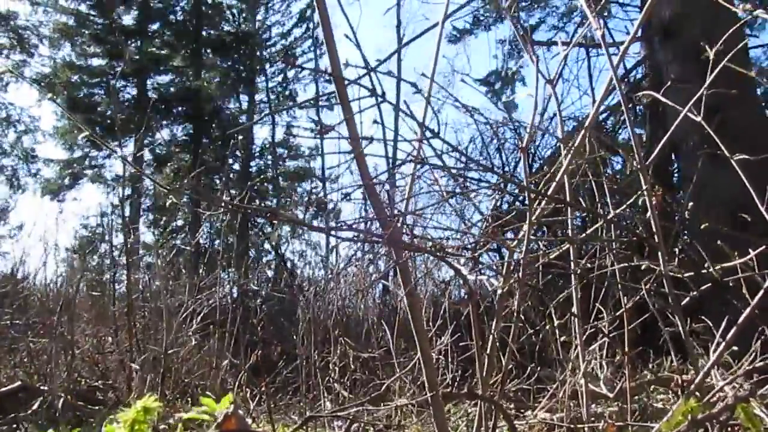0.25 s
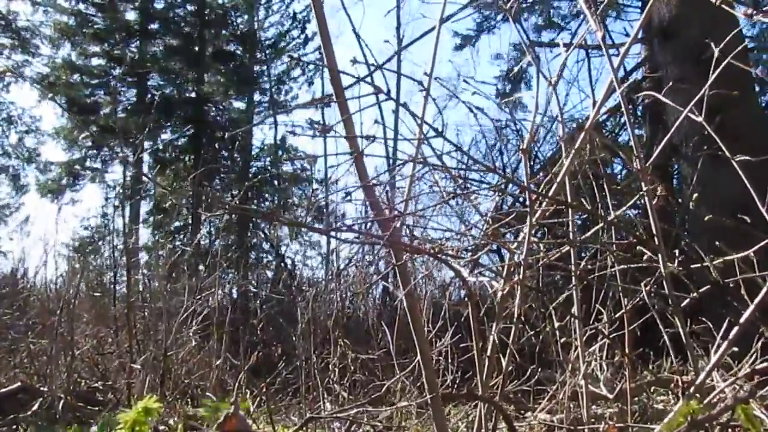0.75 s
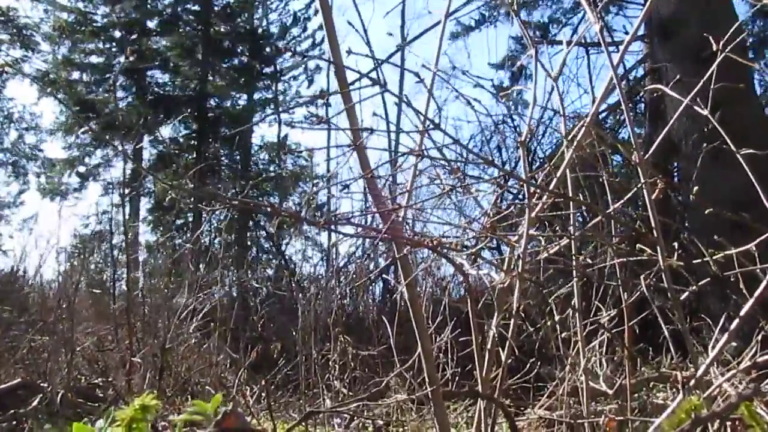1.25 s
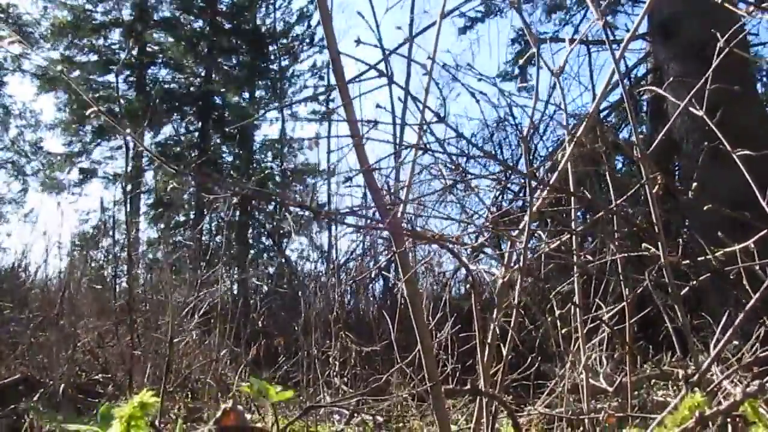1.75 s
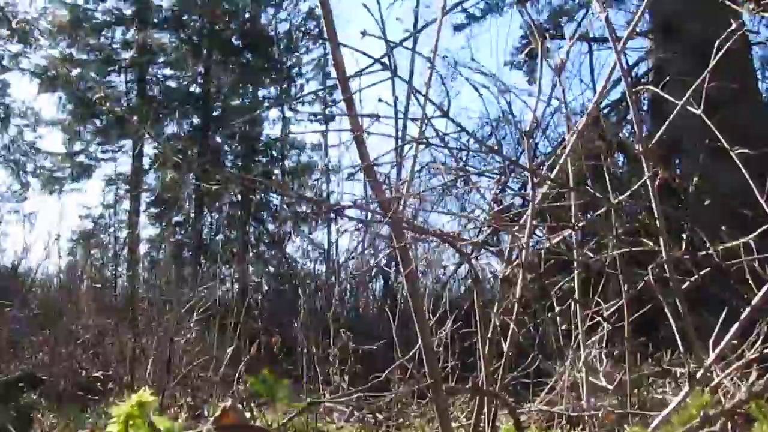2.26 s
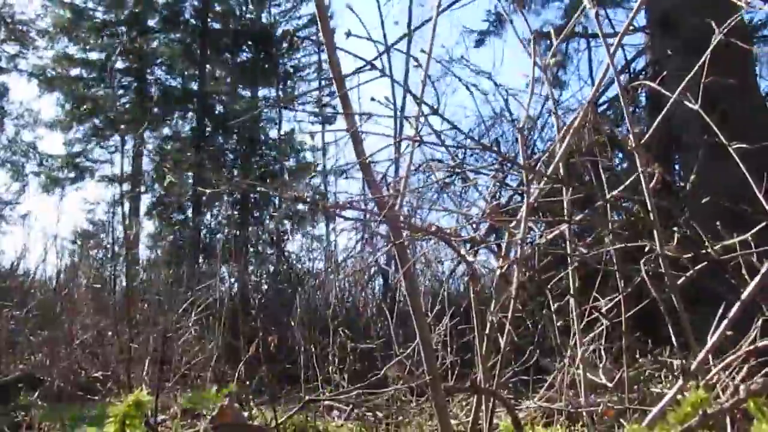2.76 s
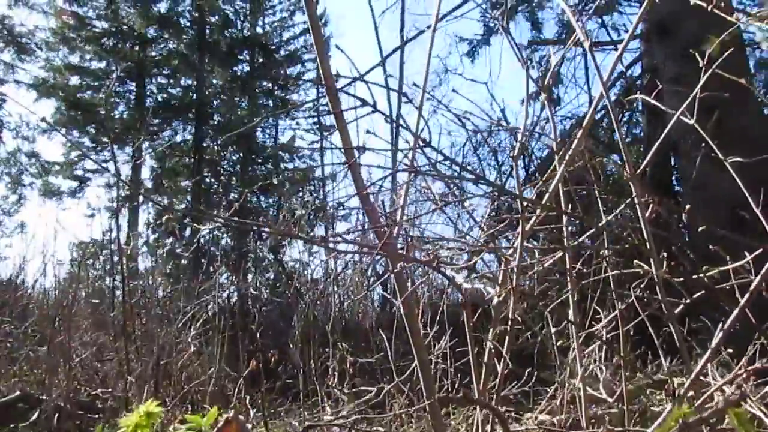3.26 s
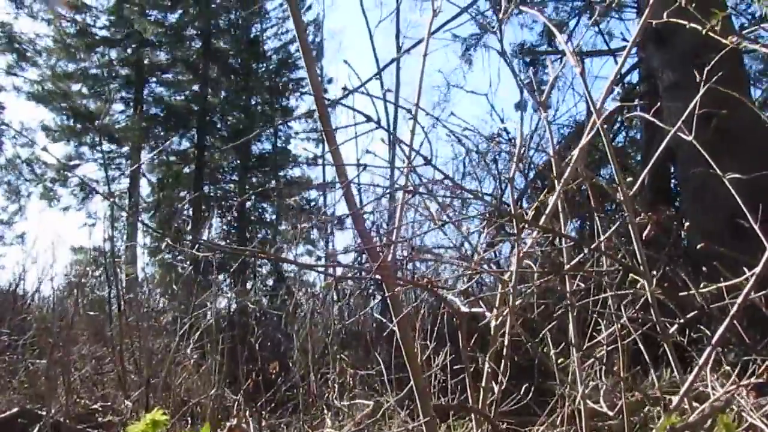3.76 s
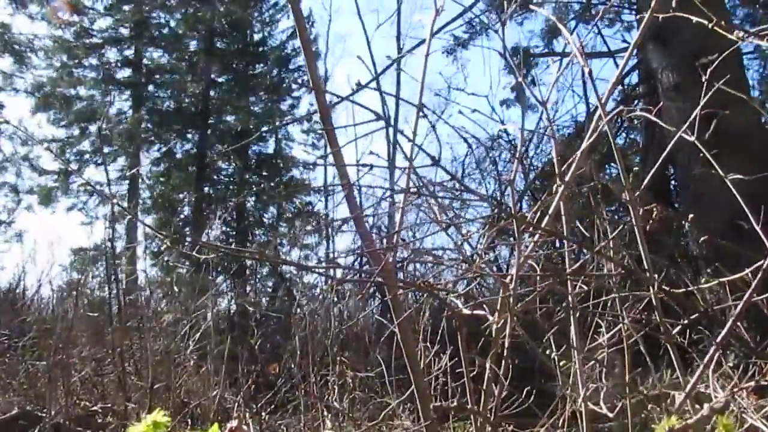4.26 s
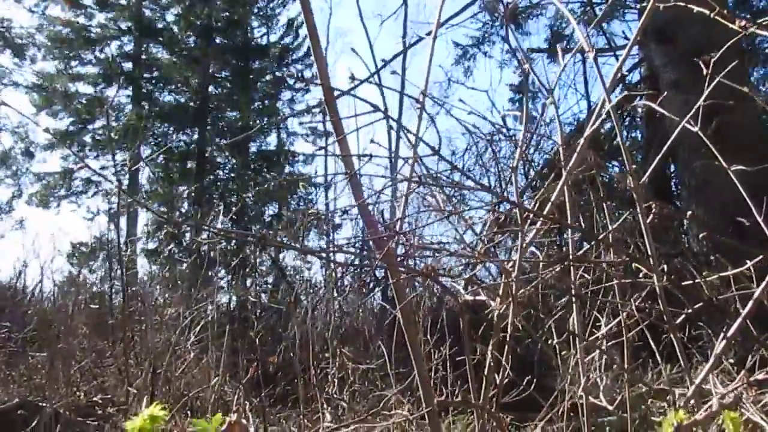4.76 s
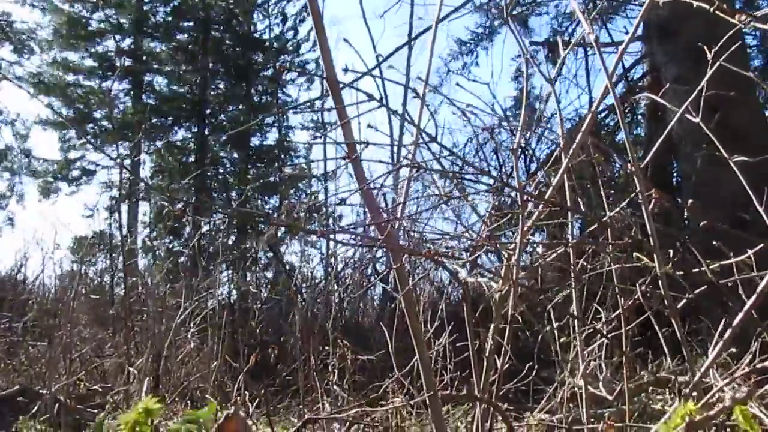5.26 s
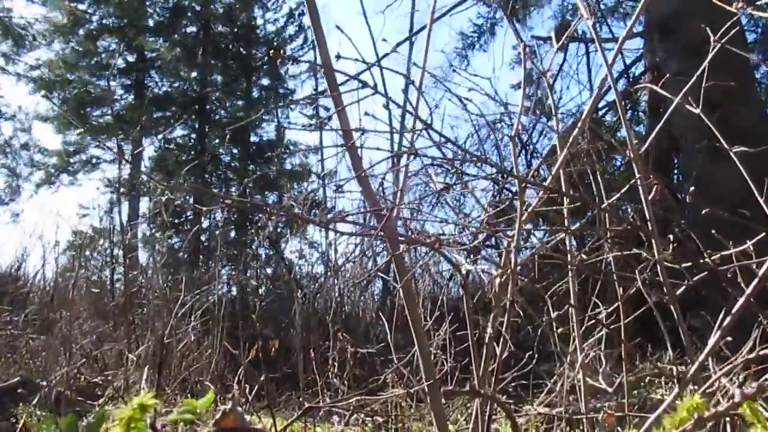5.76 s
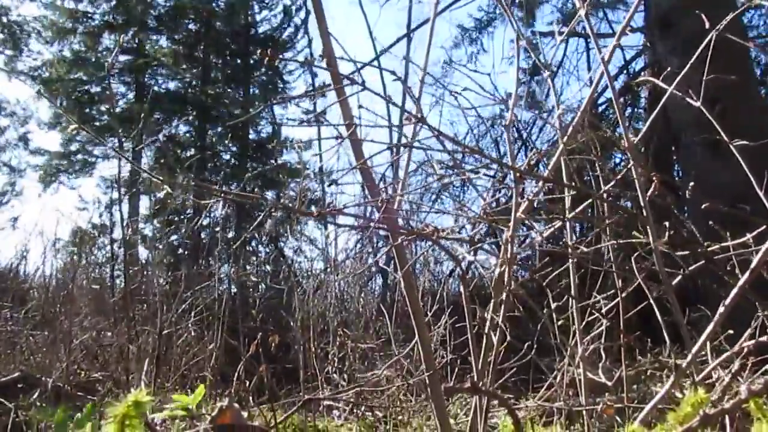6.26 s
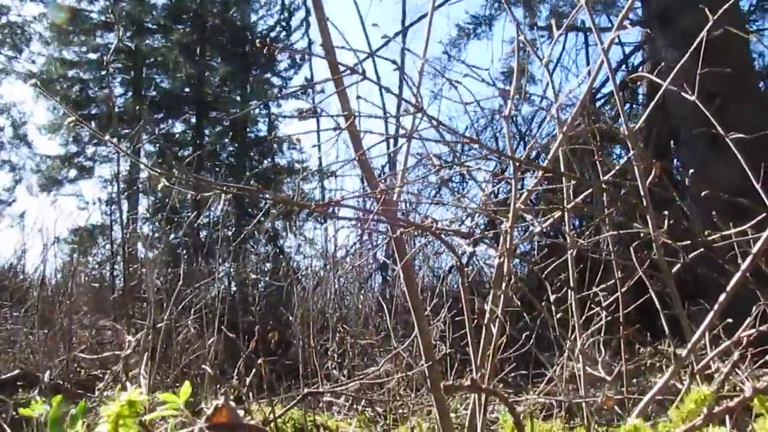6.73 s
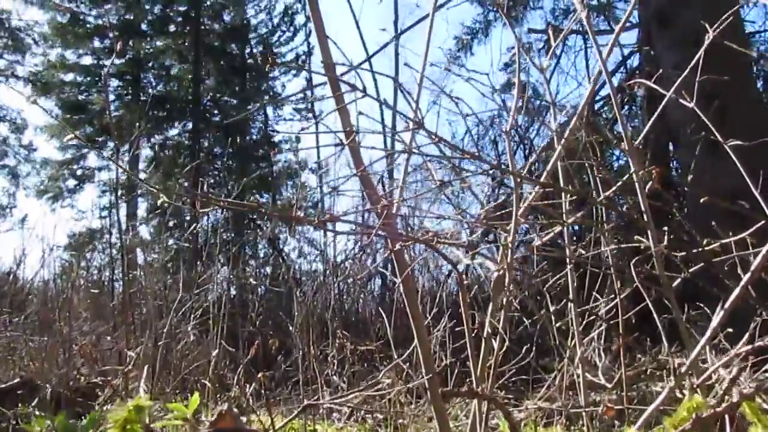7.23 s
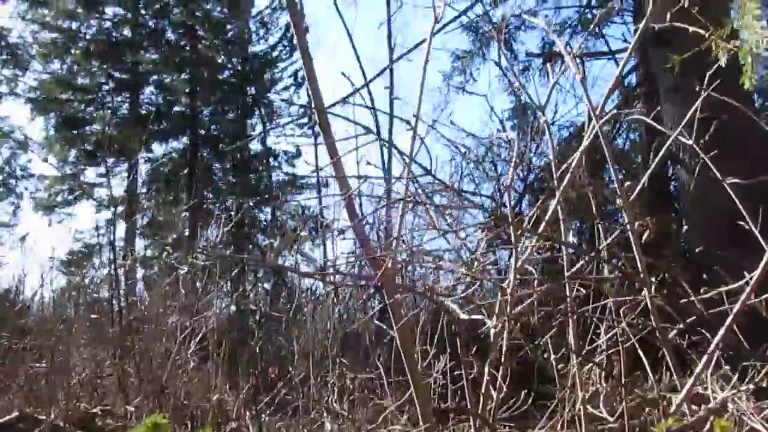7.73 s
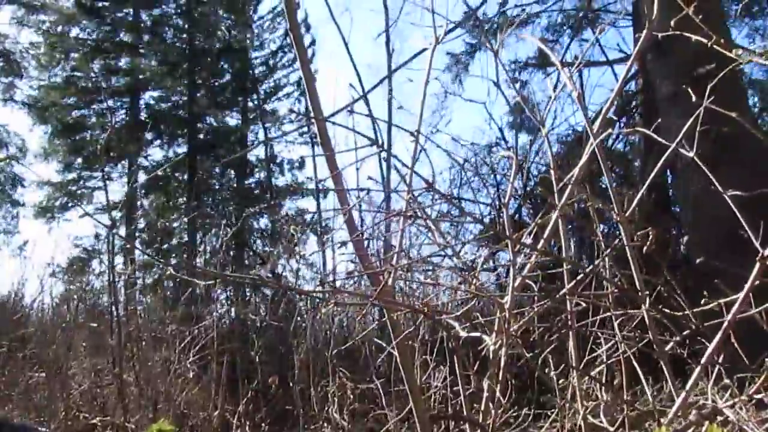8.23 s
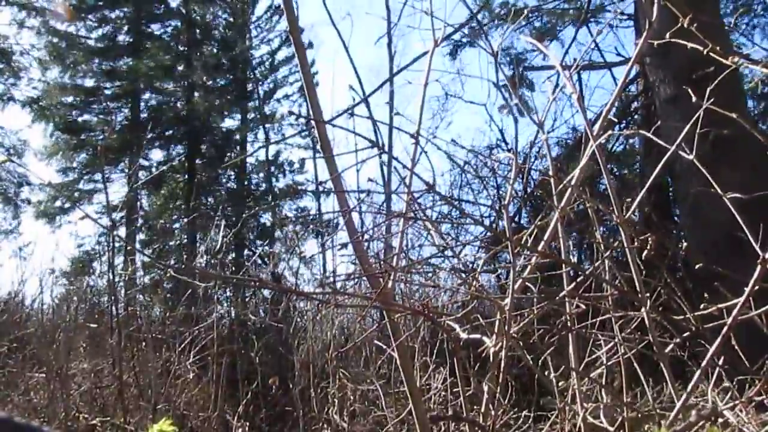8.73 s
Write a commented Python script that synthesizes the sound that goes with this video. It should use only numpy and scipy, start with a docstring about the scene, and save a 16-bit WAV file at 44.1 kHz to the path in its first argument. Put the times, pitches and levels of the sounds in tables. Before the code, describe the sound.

Strong wind hisses through conifer crowns while gusts rumble and slap hard against the microphone, easing in the middle, then the treetops swell louder.

```python
"""Strong wind rushes through conifer crowns and gusts buffet a small two-port microphone near the ground.
The wide hiss of the needles opens strong; hard slaps at the ports crowd in from 0.7 to 2.7 s and the hiss
sags. Lumpy rumble, higher in pitch where the air is faster, runs on; slaps thicken again from 3.6 to 4.7 s,
then get rare. A few dry twigs tick from 1.5 s on, and the crowns swell towards the end.
Needles are shaped noise, buffets a noise pattern read at the air speed, slaps and twigs short swings."""
import sys
import numpy as np
from scipy import signal
from scipy.fft import rfft, irfft
from scipy.io import wavfile
from scipy.ndimage import uniform_filter1d

SR = 44100
rng = np.random.default_rng(int(sys.argv[2]) if len(sys.argv) > 2 else 0)


def to_wav(s):
    """Save 16-bit WAV."""
    ch = np.atleast_2d(s).T  # columns
    pcm = np.round(np.clip(ch, -1, 1) * 32767)  # PCM
    wavfile.write(sys.argv[1], SR, pcm.astype(np.int16))


N = 396459  # samples, 8.99 s

# small fast eddies that slap a port: middle t/s, nominal level/dB, port (0 left, 1 right), nominal f/Hz
SLAP_EDDIES = [(0.366, -8, 0, 449), (0.726, -3.5, 1, 514.7), (0.737, 3, 1, 440), (0.748, -5, 0, 492),
               (0.761, -11, 1, 547), (0.777, -6.5, 1, 458), (0.813, -15, 0, 411), (0.905, -8, 0, 400),
               (1.05, -12, 0, 449.7), (1.148, -17, 1, 420.5), (1.643, -5, 0, 429), (1.673, -11, 1, 406),
               (1.704, -7, 0, 518.6), (1.729, -13, 0, 454), (1.767, -2.5, 0, 521.8), (1.816, -8, 0, 376.5),
               (1.896, 4.5, 0, 630), (1.917, 1.5, 1, 607), (1.928, 3, 1, 409), (2.003, -10, 0, 519),
               (2.073, -10, 0, 400.3), (2.098, -12, 0, 490), (2.12, -11.5, 0, 451), (2.133, -11.5, 0, 505),
               (2.161, -18, 0, 526), (2.226, -8.5, 0, 567.5), (2.232, -12, 1, 461), (2.24, -8, 0, 637),
               (2.289, -13.5, 1, 549.9), (2.303, -13, 0, 515), (2.317, -11, 1, 460), (2.319, -11, 0, 668),
               (2.34, -10.5, 1, 427), (2.48, -13, 0, 467.5), (2.494, -6, 0, 440), (2.495, -13, 1, 410),
               (2.519, -12, 1, 424), (2.551, -6, 1, 486.4), (2.555, -6, 0, 414.5), (2.642, -19, 0, 438.4),
               (2.655, -8.5, 0, 411.8), (3.655, -14, 1, 528), (3.705, -12, 1, 378.4),
               (3.754, -7.5, 1, 400.3), (3.821, -10.5, 1, 392.2), (3.854, -10, 1, 421),
               (4.041, -14, 0, 420), (4.065, -5, 0, 418.4), (4.092, -9.5, 1, 470), (4.113, -15, 0, 460.3),
               (4.126, -9, 0, 379.7), (4.156, -13, 0, 480.7), (4.166, -6.5, 0, 549.4),
               (4.281, -15, 0, 408.6), (4.296, -8.5, 1, 410), (4.41, -10, 0, 438.4), (4.492, -6, 1, 409.7),
               (4.546, -14, 1, 402.2), (4.578, -16, 1, 565.8), (4.636, -10.5, 1, 511),
               (5.37, -12.5, 1, 490.4), (6.441, -3.5, 1, 474.8), (7.68, -12.5, 1, 396.7)]


def gain_of(db):
    """Amplitude factor of a level in dB."""
    return 10 ** (np.asarray(db) / 20)


def evened(x):
    """Scale to rms 1."""
    return x / np.sqrt(np.mean(x ** 2) + 1e-20)


def read(points, hz):
    """Read a curve of (f/Hz, value) points along a logarithmic pitch axis."""
    f, value = np.transpose(points)
    return np.interp(np.log(hz + 1), np.log(f + 1), value)


def wander(seconds):
    """Smooth chance of rms 1 that changes over the given time."""
    span = max(int(seconds * SR), 1)
    once = uniform_filter1d(rng.standard_normal(N), span)
    return evened(uniform_filter1d(once, span))


def add(mix, s, sound, pan_db):
    """Place a sound between the channels; the mean of the two channel gains stays 1."""
    start = round(s * SR)
    part = mix[:, start:start + len(sound)]
    louder = gain_of(np.minimum([[pan_db], [-pan_db]], 0))
    part += louder * sound[:part.shape[1]] * 2 / louder.sum()


def drops():
    """Level change of the rush in dB: a quick fall at each drop and a slow creep back."""
    # falls of the rush, most of them close to hard slaps: t/s, nominal depth/dB
    falls = [(.36, 1.5), (.725, 9), (1.645, 2.5), (1.71, 1.5), (1.92, 10), (2.49, 1), (3.72, 2), (4.08, 2),
             (4.41, 2), (4.49, 1.5), (6.44, 1)]
    fall_s, return_s = 0.0069, 0.52  # time constants
    t = np.arange(N) / SR
    start, depth_db = np.array(falls)[:, :1], np.array(falls)[:, 1:]
    after = np.maximum(t - start, 0)
    dips = depth_db * (1 - np.exp(-after / fall_s)) * np.exp(-after / return_s)
    return -dips.sum(0)


def crowns():
    """Countless needles shed tiny vortices: noise with drifting patches and a faint shared flicker."""
    # swell of the crowns: t/s, level/dB, extra treble/dB (full over 9 kHz), extra body/dB (full under 1.8 kHz)
    swell = [(0, -25.5, .5, -2), (.3, -26, 0, 0), (.7, -26.5, 1, -0.5), (1.1, -27, .5, .5),
             (1.6, -26.5, 1, 0), (2.1, -33, 0.5, 1), (2.6, -30.5, 0.5, -0.5), (3.0, -29, -1, 0),
             (3.6, -27.5, -0.5, 0), (4.3, -29.5, 0, -0.5), (5.0, -31, 0.5, 0.5), (5.6, -30, -1, 1),
             (6.3, -29.5, 0, 1.5), (6.8, -31.5, .5, 3), (7.5, -28, 0, 1), (8.1, -26, 1, 0.5),
             (8.6, -21.5, -0.5, -0.5), (8.99, -21.5, 0, -.5)]
    # tone of the needles: f/Hz, relative level per Hz/dB
    needle_tone = [(150, -17), (250, 0.5), (400, -6), (600, -8.5), (800, -10.5), (1120, -5.5), (1500, -3),
                   (1900, -2.5), (2300, -5), (3000, -8), (4200, -13.5), (6000, -19.5), (8500, -27),
                   (12000, -38.5), (15600, -48)]
    # left-right likeness: f/Hz, likeness (0 apart, 1 the same)
    likeness = [(140, .5), (300, .88), (500, .9), (800, .75), (1300, .8), (1900, .68), (2800, .36),
                (4200, .22), (6400, .12), (10000, 0)]
    # tilt between the channels: f/Hz, left minus right level/dB
    tilt = [(60, 3), (180, -1.5), (550, 0), (1650, -1.5), (4970, -3.0), (15000, -0.5)]
    # how far left leads right: f/Hz, phase/rad
    left_lead = [(200, 0), (700, -.4), (1000, -.1), (1700, -.15), (2300, -.6), (3000, -.2), (5200, -.7),
                 (9800, -2.3), (15000, -4.5)]

    frames, hop = N // 128 + 5, 128
    hz = np.fft.rfftfreq(512, 1 / SR)
    a, b, c, d, patches, flicker = rng.standard_normal((frames, 257, 6)).T
    # patches span few bands and frames; the flicker is shared by a wide stretch of bands
    patches = uniform_filter1d(uniform_filter1d(patches, size=30, axis=1), size=8, axis=0)
    flicker = uniform_filter1d(uniform_filter1d(flicker, size=14, axis=1), size=120, axis=0)
    patches, flicker = evened(patches), evened(flicker)

    same = np.clip(read(likeness, hz), -1, 1)[:, None]
    left = a + 1j * b
    shared = same * left * np.exp(-1j * read(left_lead, hz))[:, None]
    right = shared + np.sqrt(1 - same ** 2) * (c + 1j * d)
    lean = gain_of(read(tilt, hz) / 2)[:, None]

    s, level_db, treble_db, body_db = np.transpose(swell)
    frame_s = np.arange(frames) * hop / SR
    treble = np.interp(frame_s, s, treble_db) * np.clip(hz / 3000 - 2, 0, 1)[:, None]
    body = np.interp(frame_s, s, body_db) * np.clip(2.8 - hz / 1000, 0, 1)[:, None]
    flicker_db = (0.18 + 0.2 * hz[:, None] / 10000) * flicker  # deeper in the treble
    z = np.array([left * lean, right / lean])
    z *= gain_of(read(needle_tone, hz)[:, None] + treble + body + 0.46 * patches + flicker_db)
    hiss = evened(signal.istft(z, nperseg=512, noverlap=512 - hop)[1][:, :N])
    return hiss * gain_of(np.interp(np.arange(N) / SR, s, level_db) + drops())


def twigs():
    """Dry ticks: a noisy ring that dies by 60 dB in 6 ms."""
    # ticks: t/s, nominal level/dB, left minus right level/dB, f/Hz
    ticks = [(1.5279, -40, -1, 8530), (1.9217, -46, -2.5, 7643), (3.2996, -39, 2, 7420),
             (4.4862, -41, -5.0, 7237), (5.0654, -42, -1.5, 8740), (5.2783, -40, 1.5, 7728),
             (8.0887, -41, -13, 7347)]
    mix, t = np.zeros((2, N)), np.arange(200) / SR
    rattle = rng.standard_normal((len(ticks), 200))
    for (s, level_db, pan_db, hz), noise in zip(ticks, rattle):
        ring = np.sin(2 * np.pi * hz * t) + 0.45 * noise
        add(mix, s, gain_of(level_db - 60 * t / 0.006) * ring, pan_db)
    return mix


def air(side):
    """Gain and speed at one port: bell-shaped gusts add power to the lull; speed is the power-weighted mean."""
    # gusts: middle t/s, peak level/dB, width at -6 dB/ms, port (0 left, 1 right), air speed as a factor
    gusts = [(0.24, -19.5, 68, 0, 0.84), (0.344, -10.0, 75.5, 0, 1.45), (0.376, -21, 63.5, 1, 1.12),
             (0.451, -15.5, 65, 0, 1.37), (0.728, -17, 55, 0, 1.61), (0.738, -8, 44, 1, 1.46),
             (0.818, -17, 226, 1, 1.52), (0.905, -15.5, 54, 0, 1.2), (1.072, -21, 93, 0, 1.6),
             (1.115, -13.5, 115, 1, 1.24), (1.245, -18.0, 47, 1, 1.25), (1.399, -22, 35.5, 0, 0.91),
             (1.617, -13.9, 93, 0, 1.45), (1.634, -16.5, 104.5, 1, 1.15), (1.711, -9.5, 35.5, 0, 1.36),
             (1.758, -15.5, 172, 0, 1.49), (1.762, -21, 50, 1, 0.72), (1.77, -9.5, 34.5, 0, 1.7),
             (1.893, -11, 75, 0, 1.26), (1.919, -10, 64, 1, 1.49), (2.013, -21, 44, 0, 1.56),
             (2.224, -13, 46.5, 0, 1.03), (2.294, -18.5, 116, 1, 1.37), (2.484, -14.5, 40, 0, 1.34),
             (2.517, -17, 104, 0, 1.11), (2.522, -13, 90.5, 1, 1.24), (2.551, -13.5, 41, 0, 1.44),
             (2.659, -19.5, 50, 0, 1.82), (3.051, -30.5, 83.5, 0, 0.86), (3.17, -22, 80, 1, 1.13),
             (3.441, -18.5, 85, 1, 1.22), (3.508, -22.0, 56.5, 0, 1.32), (3.624, -20, 143, 1, 1.67),
             (3.654, -15.5, 37, 1, 1.53), (3.768, -16.5, 181, 1, 1.71), (3.907, -19.5, 115, 0, 1.57),
             (4.085, -15, 108.5, 1, 1.36), (4.101, -14.2, 134, 0, 1.68), (4.355, -18.5, 263, 0, 1.28),
             (4.361, -21.5, 168, 1, 1.5), (4.37, -11.5, 40, 0, 0.99), (4.47, -15.0, 39.5, 0, 1.01),
             (4.489, -11, 35, 1, 1.25), (4.595, -16.5, 125.5, 1, 1.25), (4.753, -16, 98, 1, 1.64),
             (4.767, -22.5, 50.5, 0, 0.83), (4.872, -24, 54, 0, 0.71), (5.108, -20.5, 180, 1, 0.73),
             (5.23, -20, 91, 0, 1.26), (5.269, -21.5, 57.5, 1, 1.4), (5.419, -21.5, 138.5, 1, 1.3),
             (5.42, -18.5, 105.5, 0, 0.73), (5.989, -20, 74.5, 1, 0.97), (6.031, -18, 244, 0, 1.18),
             (6.326, -17.5, 74.5, 1, 1.28), (6.445, -12, 44.5, 1, 1.08), (6.459, -24.5, 58, 0, 0.92),
             (6.59, -17, 309.5, 1, 1.22), (6.67, -16, 50, 1, 1.3), (6.759, -24.0, 254.5, 0, 0.78),
             (6.844, -17.5, 57.5, 1, 1.54), (7.168, -20.0, 156, 1, 1.17), (7.263, -17, 38.5, 0, 1.15),
             (7.288, -20.5, 48.5, 1, 0.8), (7.31, -24.0, 262.5, 0, 1.28), (7.449, -18, 46.5, 1, 1.05),
             (7.578, -19.5, 86.5, 0, 1.06), (7.638, -19, 209, 1, 1.27), (7.68, -12, 40.5, 1, 1.87),
             (7.753, -16.5, 33.5, 1, 1.53), (7.892, -21.5, 275, 1, 1.43), (8.106, -21.5, 120.5, 0, 0.9),
             (8.482, -20.5, 59, 0, 0.98), (8.494, -26, 119, 1, 1.04), (8.667, -23.5, 193, 0, 1.08),
             (8.806, -18.5, 69, 0, 0.98), (8.807, -16.5, 36.5, 1, 1.43), (8.9, -19, 66, 0, 0.84)]
    # air between the gusts: t/s, left level/dB, right level/dB
    lull_levels = [(0.0, -30.5, -32.5), (0.6, -22.5, -30), (1.4, -26, -30.5), (2.0, -28, -31.5),
                   (2.7, -22, -30), (3.1, -38, -36), (3.6, -25.5, -21), (4.6, -27.0, -27.5),
                   (5.2, -26.5, -27), (5.7, -32, -33.5), (6.4, -28, -27.5), (7.0, -35, -32),
                   (8.2, -26, -29.5), (8.99, -27, -26)]
    lull_speed, bell_power = 1.1, 2.0

    t = np.arange(0, N + 64, 64) / SR  # a coarse grid is enough for slow air
    levels = np.array(lull_levels)
    lull = gain_of(np.interp(t, levels[:, 0], levels[:, 1 + side])) ** 2
    own = np.array([row for row in gusts if int(row[3] > .5) == side])
    s, peak_db, length_ms, _, speed = own.T[:, :, None]
    half_widths = abs(2000 * (t - s) / np.maximum(length_ms, 20))  # distance from the middle
    power = gain_of(peak_db - 6 * half_widths ** bell_power) ** 2
    total = lull + power.sum(0)
    mean_speed = (lull * lull_speed + (power * speed).sum(0)) / total
    return [np.interp(np.arange(N) / SR, t, v) for v in (np.sqrt(total), mean_speed)]


def surges(side, slow_hz=340, per_hz=.0025, seconds=.008):
    """Speed factor at one port: air speeds up briefly around each slap, most for high ones, at most doubled."""
    s, hz = np.transpose([(row[0], row[3]) for row in SLAP_EDDIES if int(row[2] > .5) == side])
    marks = np.zeros(N)
    marks[np.round(s * SR).astype(int)] = np.maximum(hz - slow_hz, 0) * per_hz
    bump = np.exp(-(np.arange(-1500, 1501) / SR / seconds) ** 2)
    return 1 + np.minimum(signal.oaconvolve(marks, bump, "same"), 1)


def port(gain, speed, surge, swirl=.2, lumps_db=4.0, follow_db=3.5, steady=0.85):
    """A frozen pressure pattern is drawn past the port at a swirling speed: faster air is higher and louder."""
    # pressure pattern frozen in the air, as heard at speed 1: f/Hz, relative level per Hz/dB
    eddies = [(10, -21), (30, 1.5), (60, 1), (100, 0), (160, -5), (250, -13), (400, -23), (700, -39),
              (1200, -33), (2000, -82)]
    flutter_db, flutter_s = 2.5, 0.017

    size = 2 ** 20
    tone = gain_of(read(eddies, np.fft.rfftfreq(size, 1 / SR)))
    pattern = irfft(rfft(rng.standard_normal(size)) * tone)
    swirling = wander(.012)
    drawn = np.cumsum(speed * surge * np.exp(swirl * swirling))  # pattern position in samples
    pressure = np.interp(drawn, np.arange(size), pattern, period=size)
    pressure *= gain_of(follow_db * swirl * swirling + lumps_db * wander(0.0096))
    # level out most of the slow loudness, so that the gain sets the gust strength
    local = uniform_filter1d(uniform_filter1d(pressure ** 2, size=1200), size=1200)
    pressure = evened(pressure / (local + 1e-20) ** (steady / 2))
    return pressure * gain * gain_of(flutter_db * wander(flutter_s))


def slaps():
    """Each slap is a swing or two on a one-sided shove, kinked in its middle; the hardest kink sharpest."""
    mix, t = np.zeros((2, N)), np.arange(-441, 441) / SR
    chance = rng.random((len(SLAP_EDDIES), 2))
    for (s, level_db, side, hz), (turn, kink_turn) in zip(SLAP_EDDIES, chance):
        swing = np.exp(-(t * hz / 0.44) ** 2) * np.sin(2 * np.pi * (turn + 0.92 * hz * t))
        kink = np.exp(-(t * hz / 0.2) ** 2) * np.sin(2 * np.pi * (kink_turn + 1.2 * hz * t))
        push = np.exp(-(t * hz / 1.17) ** 2) * np.sign(turn - .5)  # shove of the air under the swing
        slap = swing + 0.52 * push + gain_of(0.42 * level_db - 2.5) * kink
        start = round(s * SR) - len(t) // 2
        mix[int(side > .5), start:start + len(t)] += gain_of(level_db) * slap
    return mix


def scene():
    """Crowns and twigs around, rumble and slaps at each port."""
    buffets = np.array([port(*air(side), surges(side)) for side in range(2)])
    return crowns() + buffets + slaps() + twigs()


def record(dry):
    """Bass roll-off at 25 Hz, two notches, a soft knee at full scale, then the band limit."""
    # narrow dips in the recorder: f/Hz, width/Hz, depth (0-1)
    notches = [(5900, 175, 1), (7870, 260, 1)]
    edge_hz = 15735
    wet = signal.sosfilt(signal.butter(2, 25, "high", fs=SR, output="sos"), dry)
    for hz, width, depth in notches:
        wet = wet - depth * signal.lfilter(*signal.iirpeak(hz, hz / width, SR), wet)
    wet = wet / (1 + wet ** 6) ** (1 / 6)
    band = signal.firwin(2047, edge_hz, window=("kaiser", 9), fs=SR)
    return signal.oaconvolve(wet, band[None], "same")


dry = scene()
out = record(dry)
to_wav(out)
```